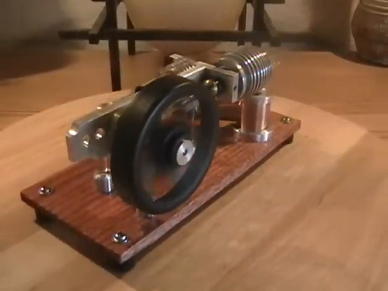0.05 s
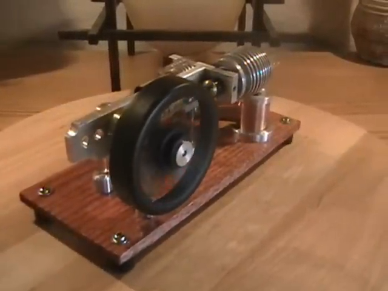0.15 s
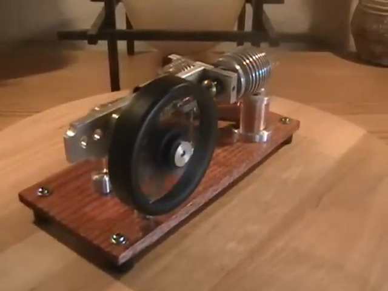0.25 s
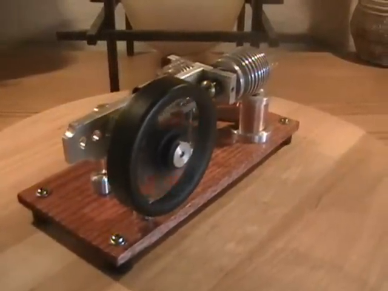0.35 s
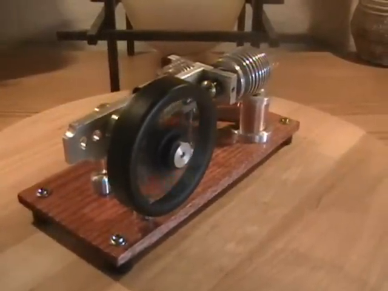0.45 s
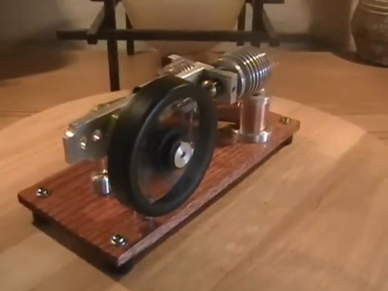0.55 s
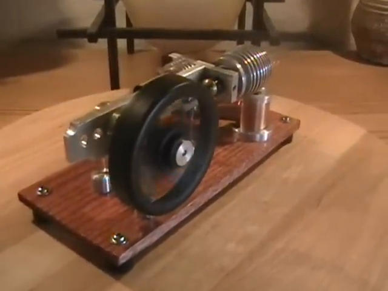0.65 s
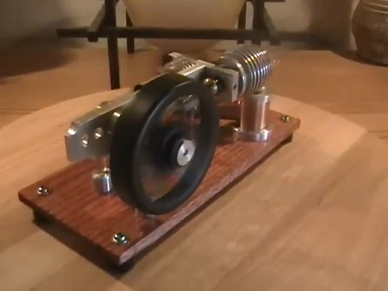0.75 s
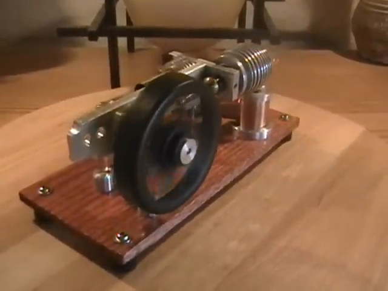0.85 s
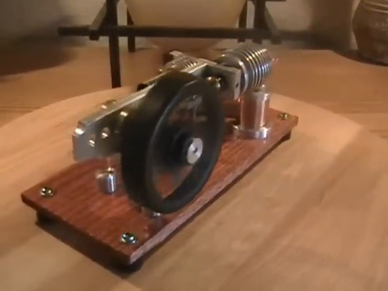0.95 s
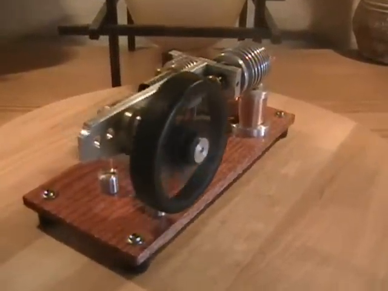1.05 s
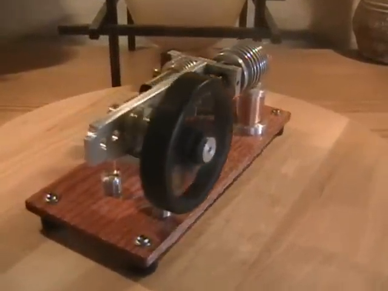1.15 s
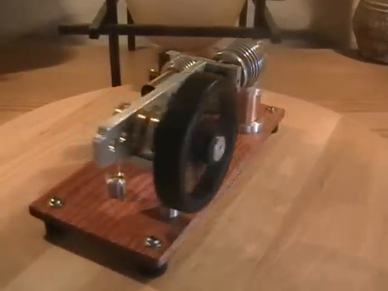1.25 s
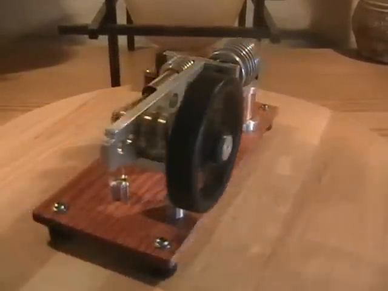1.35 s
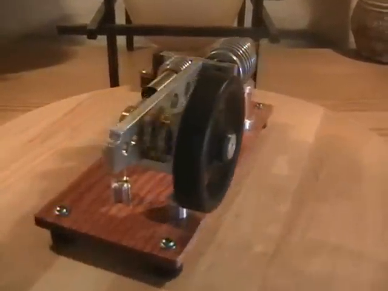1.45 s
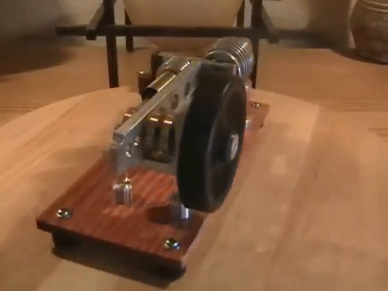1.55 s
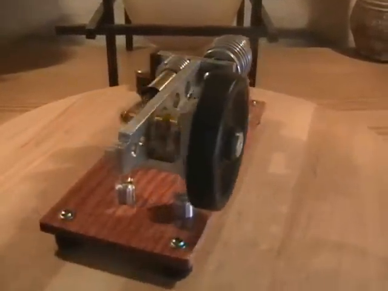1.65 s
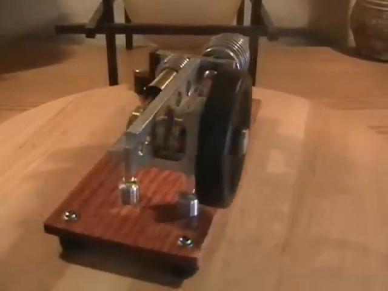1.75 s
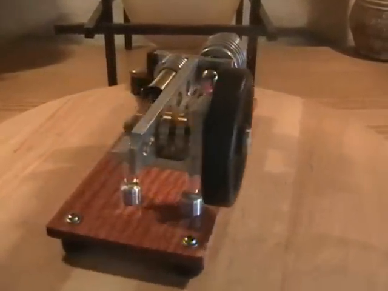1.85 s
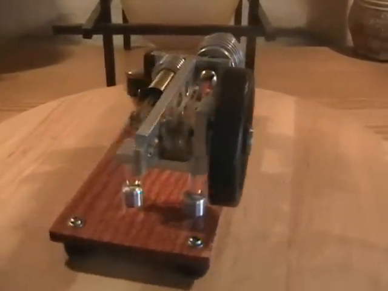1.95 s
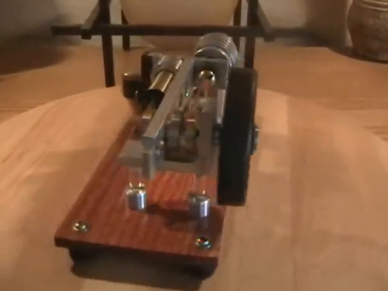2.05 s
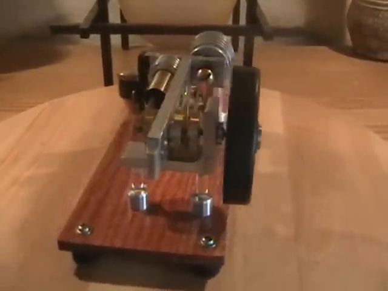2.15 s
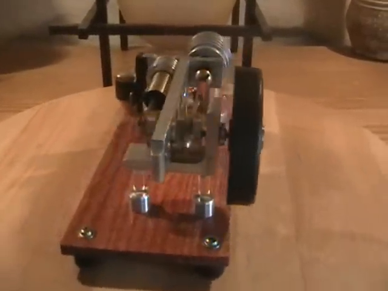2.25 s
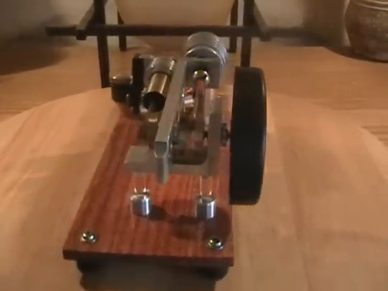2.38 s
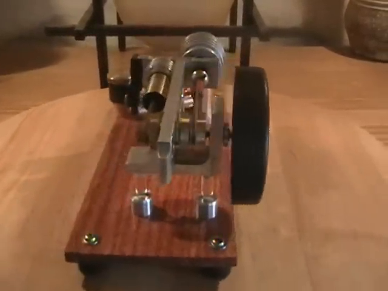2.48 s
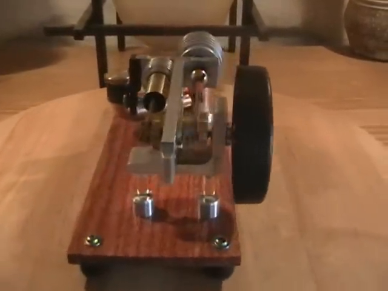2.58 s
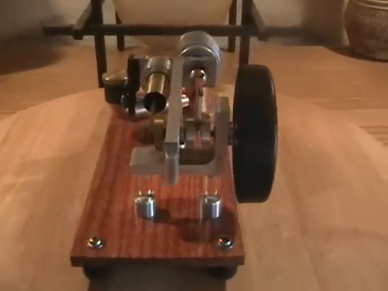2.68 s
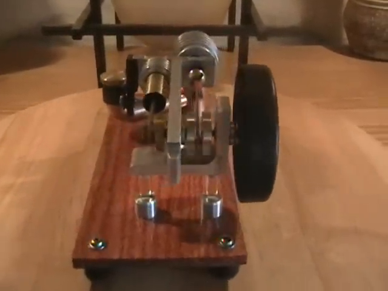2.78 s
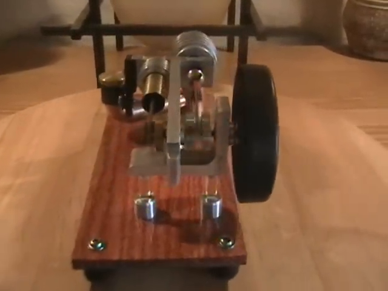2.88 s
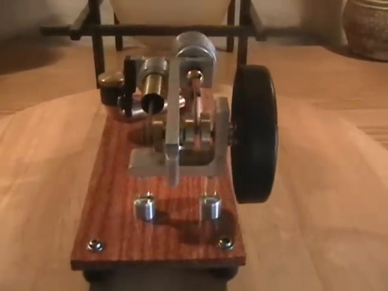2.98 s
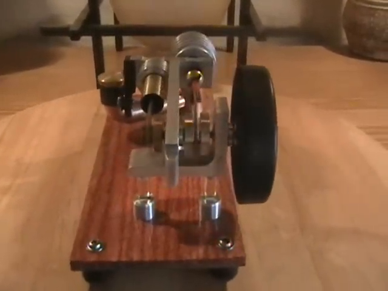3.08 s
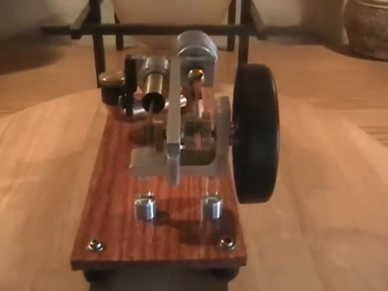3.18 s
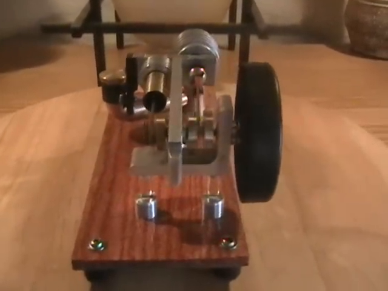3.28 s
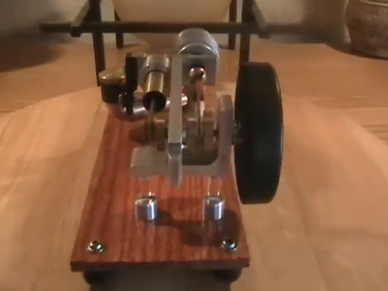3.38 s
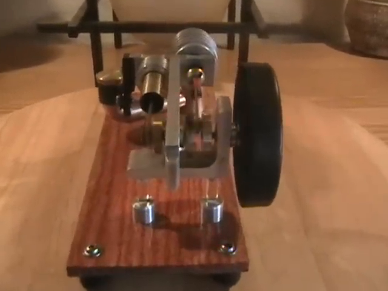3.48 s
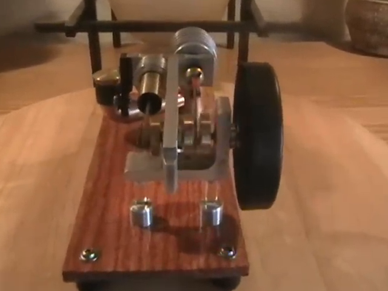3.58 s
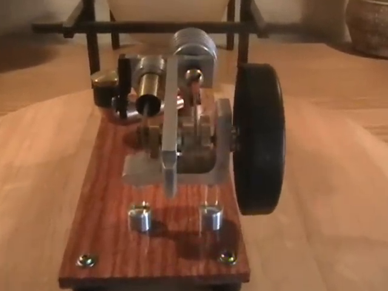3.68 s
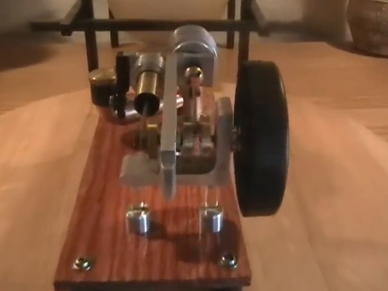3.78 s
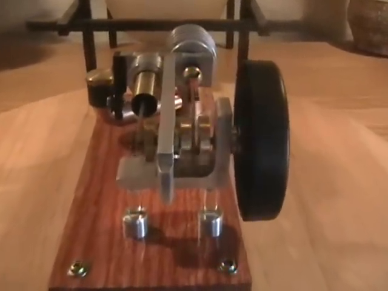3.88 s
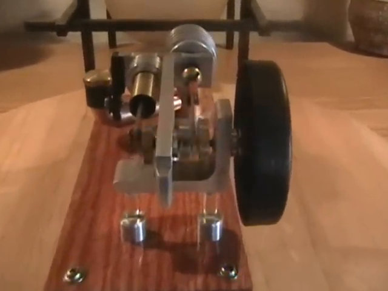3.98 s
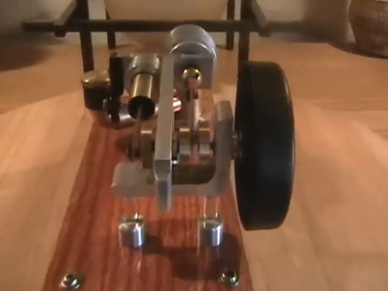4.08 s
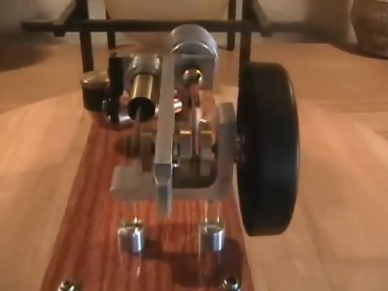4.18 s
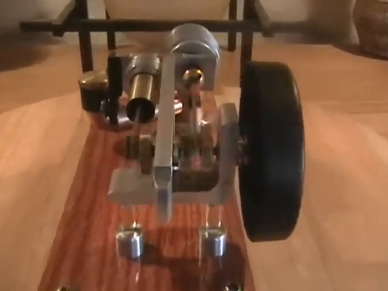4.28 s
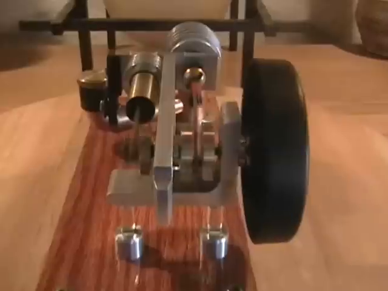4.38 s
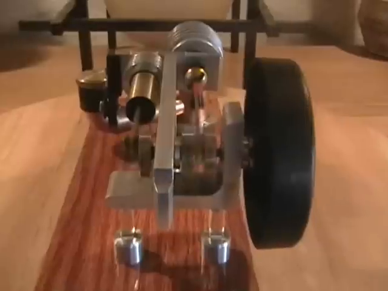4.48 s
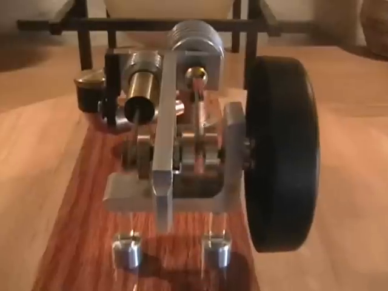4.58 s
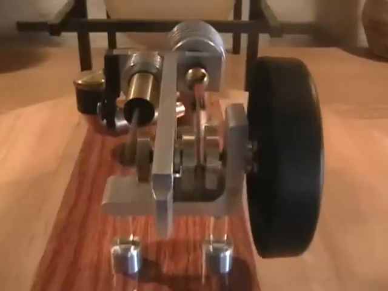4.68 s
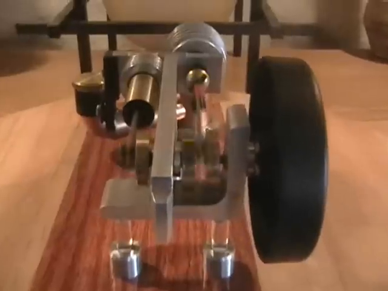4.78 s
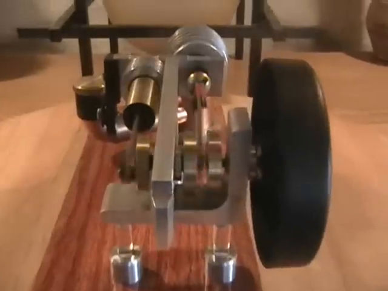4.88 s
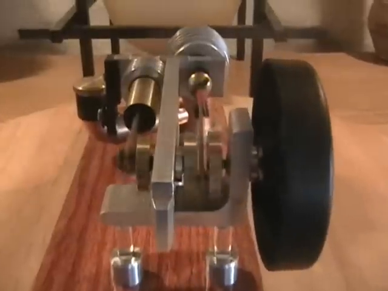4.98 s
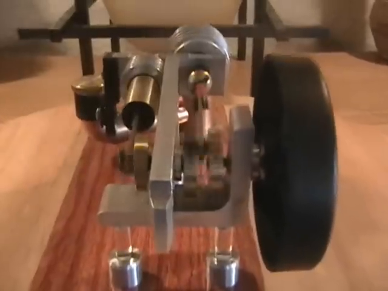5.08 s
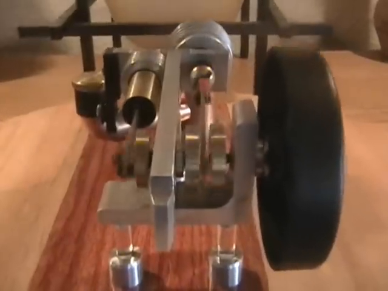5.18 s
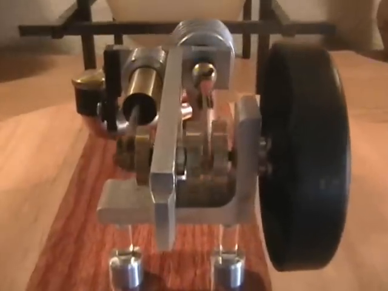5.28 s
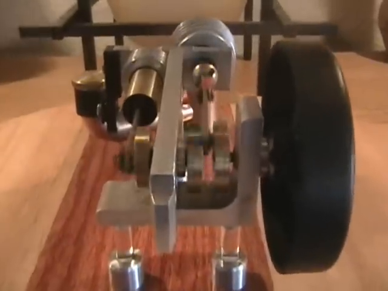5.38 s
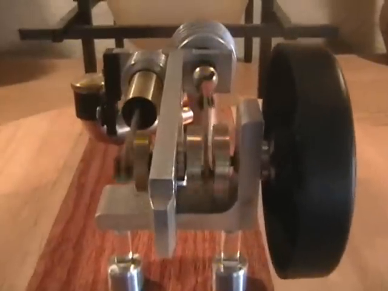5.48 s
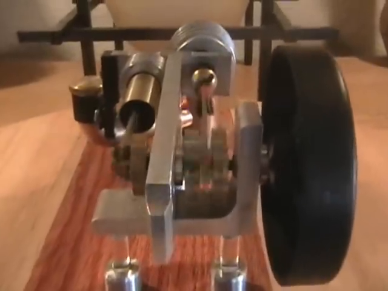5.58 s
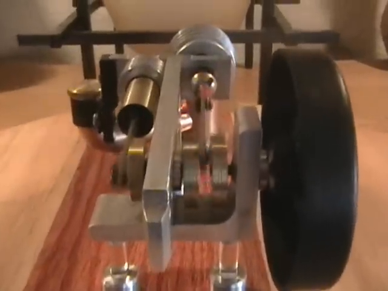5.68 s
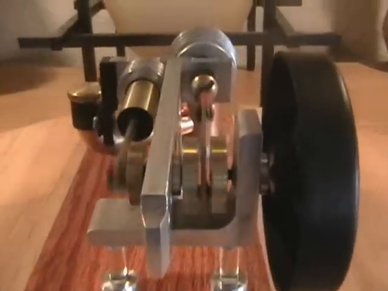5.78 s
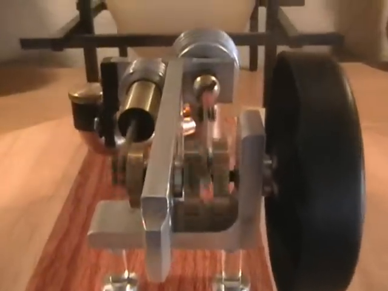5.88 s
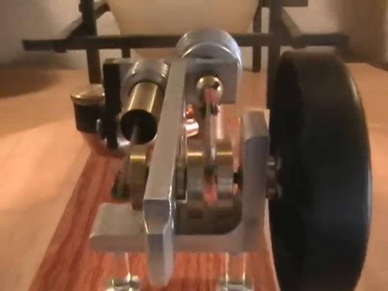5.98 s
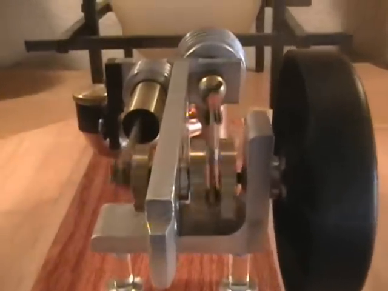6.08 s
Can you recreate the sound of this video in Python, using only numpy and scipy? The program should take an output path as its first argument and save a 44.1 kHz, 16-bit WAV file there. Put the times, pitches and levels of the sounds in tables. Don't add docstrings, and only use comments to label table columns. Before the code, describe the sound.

Fast, even metallic tick-tack of a little flywheel engine on a wooden table, faint motor hum beneath, a soft table bump after two seconds.

```python
import sys
import numpy as np
from scipy import signal
from scipy.fft import rfft, irfft, next_fast_len
from scipy.io import wavfile
from scipy.ndimage import map_coordinates

SR = 44100
rng = np.random.default_rng(int(sys.argv[2]) if len(sys.argv) > 2 else 0)


def linear_from_db(decibels):
    return 10 ** (np.asarray(decibels, float) / 20)


def to_wav(sig):
    pcm = np.clip(np.atleast_2d(sig), -1, 1) * 32767
    pcm = np.round(pcm).astype(np.int16)
    wavfile.write(sys.argv[1], SR, pcm.T)


N = 270774
T = np.arange(SR // 10) / SR
EARLY = slice(0, SR // 60)

# frequency in Hz, level on the out stroke in dB,
# level on the back stroke in dB, t60 in seconds.
FRAME_MODES = [(1960, -7, -5, .07), (2053, 0, 0, .08), (2166, -4, -1, .07), (2277, -7, 1, .07),
               (2345, -13, -5, .06), (2468, -15, -7, .06), (2570, -13, -5, .05), (2735, -18, -8, .05),
               (2870, -22, -13, .04)]
LOW_MODES = [(1635, -2, -2, .06), (1690, -4, -3, .06), (1730, 2, 2, .08), (1850, -3, -4, .06),
             (1910, -4, -4, .06)]
BASE_MODES = [(829, -7, -8, .07), (933, -1, -6, .08), (991, -2, -7, .08), (1105, -2, -2, .07),
              (1302, -5, 0, .06), (1435, -6, 0, .05), (1534, 1, 0, .05)]
BRIGHT_MODES = [(3140, -10, -7, .04), (3260, -11, -11, .045), (3333, -7, -8, .045), (3500, -12, -11, .04),
                (3660, -7, -7, .045), (3840, -2, -3, .045), (4001, 0, -4, .045), (4120, -4, -7, .04),
                (4350, -5, -6, .035), (4624, -7, 0, .04), (4935, -14, 0, .035), (5238, -15, -1, .03),
                (5572, -15, 0, .03), (5850, -20, -3, .03)]
# mode in Hz, change in dB from the side, change in dB with the crank end faced.
MODE_DIRECTION = [(933, -3, 0), (1105, 3, -3), (1730, -4, 0), (1850, 3, 3), (1960, -3, 0), (2053, 0, -4),
                  (2277, -2, -3), (2570, -3, 3), (3140, 4, 0), (3333, -6, 1), (3840, -3, 0), (4120, 1, 6),
                  (4350, 1, -8), (4624, 4, -5)]

# time in seconds, turns made.
CRANK_TURNS = [(.0018, 0), (.9453, 6), (1.8874, 12), (2.2012, 14), (2.6713, 17), (3.6133, 23), (4.2409, 27),
               (5.0235, 32), (5.8054, 37), (6.1177, 39)]
BACK_AFTER_S = .0753
# time in seconds, out-stroke blow in dB,
# back-stroke blow in dB, crank end facing the microphone from 0 to 1.
BLOW_COURSE = [(0, -37.5, -39, 0), (.3, -37.5, -41.5, 0.13), (.8, -37, -39, 0.04), (1.6, -35.5, -40.5, 0),
               (2.25, -36, -39, 0.33), (2.55, -39.5, -38.5, 0.83), (3, -37, -37, 0.58),
               (3.4, -37, -39, 0.4), (3.8, -37.5, -39, 0.73), (4.2, -36, -35, 0.6), (4.7, -34.5, -35, 1),
               (4.9, -33, -35, 0.73), (5.2, -33.5, -32, 1), (5.45, -32.5, -34.5, 0.97),
               (6.14, -33, -33.5, 0.99)]
# dB from the side, dB more when faced, scatter in dB.
OUT_PARTS = [
    (12.5, -1, 0.07),
    (-1.5, 7, 0.5),
    (12.5, -2, 1.5),
]
BACK_PARTS = [
    (12, -2.8, .6),
    (-5.5, 11, 4.8),
    (12, -15, 1.8),
]
# time in seconds, ring dB more, leading mode in Hz.
OUT_ODD_BLOWS = [(0, -1, 2055), (.79, -2, 2160), (1.1, 1, 2055), (1.73, -2.5, 2055), (2.2, 3, 2055),
                 (2.36, 3, 2055), (2.51, -1, 2055), (2.67, -3, 2170), (2.99, 3.5, 2055), (3.3, -2.5, 2160),
                 (3.46, 1.5, 2055), (3.61, 4, 2055), (4.08, -0.3, 1960), (4.4, -3, 1730), (4.55, 0, 1930),
                 (4.71, 0, 2160), (5.34, -1.5, 2070), (5.49, 0, 2055), (6.12, 4, 2055)]
BACK_ODD_BLOWS = [(.08, -1.5, 2300), (.39, 3.5, 2055), (.86, -2.2, 2350), (1.02, -4, 2055),
                  (1.18, -6, 2070), (1.33, -3.5, 2055), (2.27, 0.5, 2120), (2.43, 2.5, 2055),
                  (2.75, -5.5, 2055), (3.06, -3.5, 2340), (3.37, 3, 2055), (3.53, 6, 2130),
                  (4.16, -1.5, 1860), (4.32, -1, 1900), (4.47, 1, 2170), (4.79, -5.5, 1960),
                  (4.94, 2.2, 2100), (5.1, 0, 2350), (5.26, -0.5, 2270), (5.41, 2, 2270), (5.57, 6.5, 2350),
                  (5.72, 1, 2320), (6.04, 1.5, 2340)]
LEAD_HZ = 2055
LEAD_DB, LEAD_FADES_DB = 3, 5
LEAD_LONGER = .7
LOW_LED_DB = 4.5
BASE_SCATTER_DB = 1.2

# frequency in Hz, density in dB per Hz.
OUT_CRACK = [(700, -26), (1500, 2.5), (2800, 9), (4200, 7.5), (5800, 7), (6700, -5), (8600, 1), (10500, 0),
             (14500, -13), (16500, 7.5)]
BACK_CRACK = [(700, -28), (1500, 10), (2800, 4), (5500, 10), (6700, 0), (10000, -1), (12800, 1.5),
              (14500, -1), (16500, -28)]
# frequency in Hz, density in dB per Hz.
PLATE_THUMP = [(200, -19), (400, 2), (650, 25), (850, 11), (1200, -21.5)]

# seconds after the out stroke, dB over the blow,
# dB more when faced, scatter in dB, base share in dB, base dB more when faced.
ROD_TAPS = [
    (.054, 0, 5.5, 3, -16, -4),
    (.1285, 4, 6, 1.5, -6, -10),
]
TAP_SLOP_S = .002
# time in seconds, level in dB, base share in dB.
ROD_JUMPS = [
    (2.347, -32, 0),
    (2.413, -27, -24),
    (2.484, -29.5, -18),
]
# time in seconds, level in dB.
RATTLE_COURSE = [
    (0.0, -43),
    (2.19, -44),
    (3.91, -44),
    (4.94, -42),
    (5.93, -41),
    (6.14, -41.5),
]

# time in seconds, peak in dB.
STRAY_TICKS = [
    (5.078, -24.5),
    (5.1492, -41),
]
# frequency in Hz, density in dB per Hz.
TICK_COLOUR = [(3000, -30), (6000, -5), (9000, -11), (15000, -6), (16500, -30)]
# time in seconds, level in dB, t60 in seconds.
NUDGE = [
    (2.347, -39, 0.16),
]
# frequency in Hz, density in dB per Hz.
NUDGE_THUD = [(40, -22), (70, -1), (130, -3), (250, -5), (1300, -6), (2000, -39)]

# frequency in Hz, t60 in seconds.
ROOM_DECAY = [(500, 0.16), (2000, 0.15), (6000, 0.12), (14000, 0.077)]
# frequency in Hz, density in dB per Hz.
RUMBLE_COLOUR = [(15, -70), (25, -50), (69, -14), (109, -2.5), (183, -17), (202, -12), (234, -7),
                 (253, -0.5), (266, -10.5), (440, -10.5), (588, -16.5), (1090, -20.5), (1200, -20.5),
                 (1560, -48), (2640, -120)]
HISS_COLOUR = [(590, -18), (1000, -7.5), (1200, -18), (1870, -4.5), (2100, -37.5), (2910, -13.5),
               (3980, -19), (7100, -30), (13300, -33.5), (16000, -39)]
# frequency in Hz, rms in dB, wander in Hz.
HUM_TONES = [(116, -62, 14), (135, -62, 7), (180, -67, 2), (240, -52, 1.5), (300, -66, 2)]
# frequency in Hz, rms in dB.
BODY_WHINE = [(390, -71.5), (510, -71)]
RUMBLE_DB, MURMUR_DB = -55.5, -53.5
NEAR_GAIN = 1
SHAKEN_DB, SHAKEN_MURMUR_DB, SETTLE_S = 11.5, 3.5, 0.19

# frequency in Hz, left minus right in dB.
PORT_LEVEL = [(60, 2), (150, 3.5), (380, 2.5), (950, -1.5), (2380, -2.0), (5980, -1.0), (15000, 0.5)]
# frequency in Hz, lead of the left port in radians.
PORT_LEAD = [(0, 0), (520, -0.22), (1120, -0.52), (1550, -0.3), (4390, 0.24), (7490, -0.31), (9820, 0.99),
             (11500, 0.71), (16200, -0.42)]
# frequency in Hz, gain in dB.
BAND_EDGE = [(15000, 0), (15500, -8), (16000, -22), (16600, -34), (16650, -120)]


def unit(x):
    return x / np.sqrt(np.mean(x ** 2) + 1e-20)


def along(points, hz):
    f, value = np.transpose(points)
    return np.interp(np.log(hz + 1), np.log(f + 1), value)


def curve(rows, column=1):
    return np.interp(np.arange(N) / SR, *np.transpose(rows)[[0, column]])


def wobble(rate):
    knots = rng.standard_normal(int(N * rate / SR) + 4)
    return map_coordinates(knots, [np.arange(N) * rate / SR])


def filtered(x, response):
    size = next_fast_len(x.shape[-1] + 4096)
    spectrum = rfft(x, size) * response(np.fft.rfftfreq(size, 1 / SR))
    return irfft(spectrum, size)[..., :x.shape[-1]]


def noise(colour, size):
    return unit(filtered(rng.standard_normal(size), lambda hz: linear_from_db(along(colour, hz))))


def add(track, s, sound):
    start = round(s * SR)
    sound = sound[..., max(-start, 0):]
    start = max(start, 0)
    track[..., start:start + sound.shape[-1]] += sound


def stroke_ends(after_s):
    s, turns = np.transpose(CRANK_TURNS)
    times = np.interp(np.arange(turns[-1] + 1), turns, s) + after_s
    return times[times < N / SR]


def blow_rows(column, after_s, parts, odd_blows):
    s = stroke_ends(after_s)
    at = np.round(s * SR).astype(int)
    side_db, faced_db, scatter_db = np.transpose(parts)
    faced = curve(BLOW_COURSE, column=3)[at]
    over = side_db + np.outer(faced, faced_db) + scatter_db * rng.standard_normal((len(s), 3))
    hz = np.full(len(s), float(LEAD_HZ))
    for when, more_db, lead_hz in odd_blows:
        k = np.argmin(abs(s - when))
        over[k, 0] += more_db
        hz[k] = lead_hz
        over[k, 1] += LOW_LED_DB * (lead_hz < FRAME_MODES[0][0])
    ring_db, low_db, bright_db = over.T
    blow_db = curve(BLOW_COURSE, column)[at]
    return zip(s, blow_db + ring_db, hz, low_db - ring_db, bright_db - ring_db, -ring_db)


def heard_from(modes, faced):
    shift = {hz: side + faced * (front - side) for hz, side, front in MODE_DIRECTION}
    return [(hz, a + shift.get(hz, 0), b + shift.get(hz, 0), t60) for hz, a, b, t60 in modes]


def ring(modes, stroke, scatter_db, rise, choke, lead_hz=None, lead_db=0):
    hz, t60, db = (np.array(modes)[:, [k]] for k in (0, 3, 1 + stroke))
    strength, phase = rng.standard_normal((2, len(hz), 1))
    if lead_hz:
        lead = np.exp(-((hz - lead_hz) / 45) ** 2)
        db = db + (lead_db - db) * lead
        t60 = t60 * (1 + LEAD_LONGER * lead)
    drift = np.cumsum(rng.standard_normal((len(hz), len(T))), axis=1)
    blur = .013 * (hz / 2000) ** 1.7 * drift
    decay = linear_from_db(db + scatter_db * strength - 60 * T / t60)
    waves = decay * np.sin(2 * np.pi * hz * T + 3 * phase + blur)
    damper = .05 + .95 / (1 + np.exp((T - choke) / .0025))
    x = waves.sum(0) * (1 - np.exp(-T / rise)) ** 2 * damper
    return x / np.std(x[EARLY])


def base_answer(faced, stroke, choke, base_db, thump_db):
    level = linear_from_db(base_db + BASE_SCATTER_DB * rng.standard_normal())
    modes = heard_from(BASE_MODES, faced)
    base = level * ring(modes, stroke, scatter_db=BASE_SCATTER_DB, rise=0.0022, choke=choke)
    thump = linear_from_db(thump_db - 60 * T / 0.047) * noise(PLATE_THUMP, len(T))
    return base + thump * (1 - np.exp(-T / 0.0069))


def crack(colour, faced, graze_db):
    hit = np.clip(T - .005, 0, None)
    rebound = np.clip(hit - .0035 - 0.0025 * rng.standard_normal(), 0, None)
    graze = linear_from_db(graze_db - 60 * (.005 - T) / 0.022) * (hit == 0)
    burst = linear_from_db(-60 * hit / 0.018) + 0.21 * linear_from_db(-60 * hit / 0.095)
    burst = burst + 0.63 * (rebound > 0) * linear_from_db(-60 * rebound / 0.0094)
    tilt_db = 1.2 * rng.standard_normal() - .4 * faced
    tilted = [(f, level + tilt_db * np.log2(f / 9000)) for f, level in colour]
    grit = noise(tilted, (3, len(T)))
    return (grit[0] + 0.37 * grit[1:]) * (graze + burst * (hit > 0))


def knocks(rows, stroke, crack_colour, choke, lead, base_db, thump_db, graze_db):
    out = np.zeros((2, N + SR))
    near_db, facing = curve(RATTLE_COURSE), curve(BLOW_COURSE, column=3)
    for s, db, hz, low_db, bright_db, crack_db in rows:
        i = round(s * SR)
        faced = facing[i]
        frame = ring(heard_from(FRAME_MODES, faced), stroke, scatter_db=2.5, rise=0.0014, choke=choke,
                     lead_hz=hz, lead_db=LEAD_DB - LEAD_FADES_DB * faced)
        low = ring(heard_from(LOW_MODES, faced), stroke, scatter_db=1.0, rise=0.0038, choke=choke)
        frame = frame + linear_from_db(low_db) * low
        base = base_answer(faced, stroke, choke, base_db, thump_db)
        add(out, s - lead, linear_from_db(db - 4.0) * frame + linear_from_db(near_db[i]) * base)
        bright = ring(heard_from(BRIGHT_MODES, faced), stroke, scatter_db=4.0, rise=0.0014, choke=0.019)
        add(out, s, linear_from_db(db + bright_db - 8.5) * bright)
        add(out, s - .0053, linear_from_db(db + crack_db + 9) * crack(crack_colour, faced, graze_db))
    return out[:, :N]


def tap_rows():
    rows = list(ROD_JUMPS)
    blow_db, facing = curve(BLOW_COURSE), curve(BLOW_COURSE, column=3)
    for after_s, db, faced_db, scatter_db, base_db, base_faced_db in ROD_TAPS:
        for s in stroke_ends(after_s):
            i = round(s * SR)
            late, hard, low = rng.standard_normal(3)
            level_db = blow_db[i] + db + faced_db * facing[i] ** 3 + scatter_db * hard
            rows.append((s + TAP_SLOP_S * late, level_db, base_db + base_faced_db * facing[i] + low))
    return rows


def taps():
    out, facing = np.zeros(N + SR), curve(BLOW_COURSE, column=3)
    for s, db, base_db in tap_rows():
        faced = facing[round(s * SR)]
        low = [(hz, a, b + 4 * faced, t60) for hz, a, b, t60 in LOW_MODES]
        frame = ring([*FRAME_MODES, *low], 1, scatter_db=4, rise=.002, choke=.011)
        frame = frame + linear_from_db(-14) * ring(BRIGHT_MODES, 0, scatter_db=5, rise=.002, choke=.008)
        base = ring(BASE_MODES[4:], 1, scatter_db=4.0, rise=0.0027, choke=0.0067)
        add(out, s - .002, linear_from_db(db - 15) * (frame + linear_from_db(base_db + 3.0) * base))
    return out[:N]


def rattle():
    shake = rng.standard_normal(N) * linear_from_db(3 * wobble(60) + 3.5 * wobble(200))
    modes = [(hz, b) for hz, _, b, _ in [*FRAME_MODES, *LOW_MODES]]
    modes += [(hz, b - 12) for hz, _, b, _ in BASE_MODES]
    modes += [(hz, (a + b) / 2 - 8) for hz, a, b, _ in BRIGHT_MODES]

    def body(f):
        total = 0
        for k, (hz, db) in enumerate(modes):
            width = max(70, hz / 25)
            resonance = 1j * f * 70 / (hz * hz - f * f + 1j * f * width)
            total = total + (-1) ** k * linear_from_db(db) * resonance
        return total

    return linear_from_db(curve(RATTLE_COURSE) - 5.5) * unit(filtered(shake, body))


def ticks_and_nudge():
    out = np.zeros(N + SR)
    for s, db in STRAY_TICKS:
        add(out, s, linear_from_db(db - 11 - 60 * T / 0.023) * noise(TICK_COLOUR, len(T)))
    for s, db, t60 in NUDGE:
        thud = linear_from_db(db - 60 * T / t60) * noise(NUDGE_THUD, len(T))
        add(out, s, thud * (1 - np.exp(-T / 0.0015)))
    return out[:N]


def room(x):
    hz, t, z = signal.stft(rng.standard_normal((3, SR // 3)), SR, nperseg=256)
    decay = linear_from_db(-60 * t / along(ROOM_DECAY, hz)[:, None])
    tail = signal.istft(z * decay, SR, nperseg=256)[1]
    tail = tail[1:] + 1.3 * tail[0]
    late = np.pad(x, (100, 0))[None]
    return signal.fftconvolve(late, tail / np.linalg.norm(tail[0]), axes=1)[:, :N]


def tone(hz, wander_hz):
    drift = 2 * np.pi * wander_hz * np.cumsum(wobble(25)) / SR
    return np.sin(2 * np.pi * hz * np.arange(N) / SR + drift)


def camera_motor():
    hum = sum(linear_from_db(db + 3 + 1.2 * wobble(6)) * tone(hz, wander_hz) for hz, db, wander_hz in HUM_TONES)
    whine = sum(linear_from_db(db + 6 + 1.5 * wobble(18)) * tone(hz, 6.5) for hz, db in BODY_WHINE)
    return hum + whine * [[1], [-1]]


def room_rumble():
    air = noise(RUMBLE_COLOUR, (3, N))
    deep = filtered(air, lambda hz: 1 / (1 + (hz / 210) ** 6))
    since = np.arange(N) / SR - NUDGE[0][0]
    shiver = (since > 0) * np.exp(-abs(since) / SETTLE_S)
    deep_gain = linear_from_db(RUMBLE_DB + 5 + SHAKEN_DB * shiver + 0.43 * wobble(4.4))
    murmur_gain = linear_from_db(MURMUR_DB + 4 + SHAKEN_MURMUR_DB * shiver)
    near_db = NEAR_GAIN * (curve(RATTLE_COURSE) - RATTLE_COURSE[0][1])
    rumble = (deep * deep_gain + (air - deep) * murmur_gain) * linear_from_db(near_db)

    def unlike(hz):
        return np.clip(hz / 900, .12, .8) + 0.9 * (hz < 55)

    return rumble[0] + filtered(rumble[1:], unlike)


def microphone_hiss():
    hiss = noise(HISS_COLOUR, (3, N))
    return linear_from_db(-55.0) * (0.73 * hiss[1:] + hiss[0])


def scene():
    out_blows = blow_rows(column=1, after_s=0, parts=OUT_PARTS, odd_blows=OUT_ODD_BLOWS)
    back_blows = blow_rows(column=2, after_s=BACK_AFTER_S, parts=BACK_PARTS, odd_blows=BACK_ODD_BLOWS)
    engine = knocks(out_blows, 0, OUT_CRACK, choke=0.021, lead=0.00189, base_db=-3.0, thump_db=3.5, graze_db=-20.5)
    engine = engine + knocks(back_blows, 1, BACK_CRACK, choke=0.019, lead=.003, base_db=.5, thump_db=2.5,
                             graze_db=-13)
    engine = engine + taps() + rattle() + ticks_and_nudge()
    background = camera_motor() + room_rumble() + microphone_hiss()
    return engine + linear_from_db(-11.5) * room(engine.mean(0)) + background


def band_limit(x):
    return signal.sosfilt(signal.butter(12, 16620, fs=SR, output="sos"), x)


def record(dry):
    side = np.array([[.5], [-.5]])

    def port(hz):
        gain = linear_from_db(side * along(PORT_LEVEL, hz) + along(BAND_EDGE, hz))
        return gain * np.exp(1j * side * along(PORT_LEAD, hz))

    return band_limit(filtered(dry, port))


dry = scene()
out = record(dry)
to_wav(out)
```